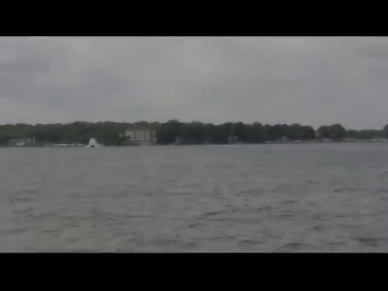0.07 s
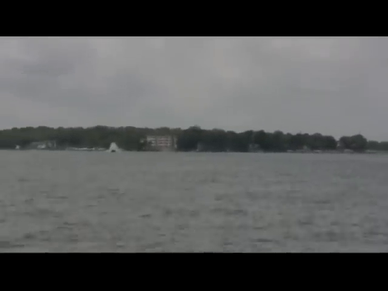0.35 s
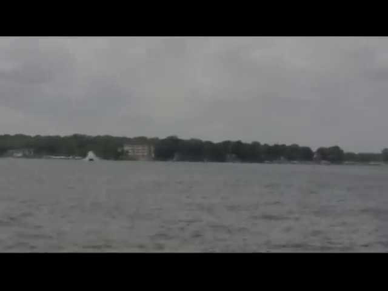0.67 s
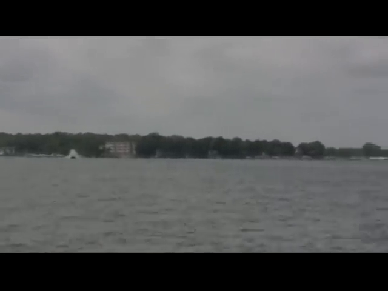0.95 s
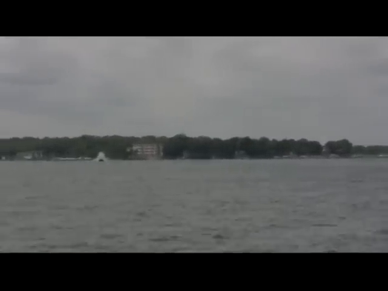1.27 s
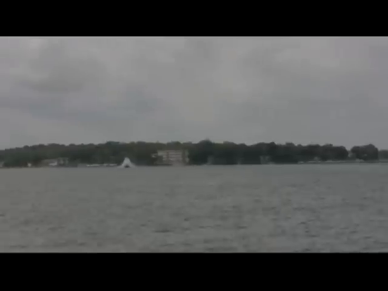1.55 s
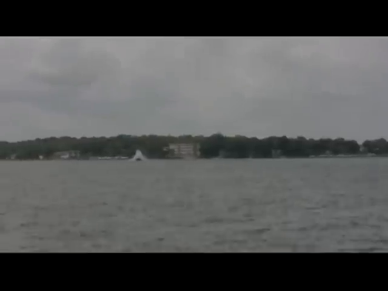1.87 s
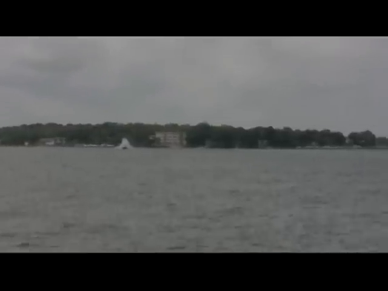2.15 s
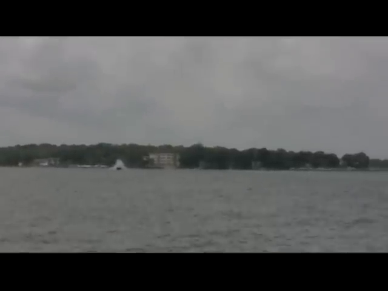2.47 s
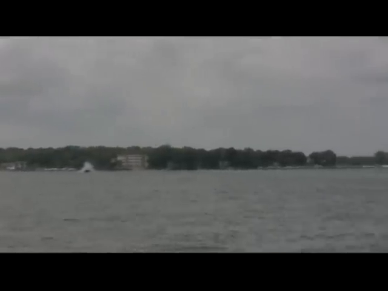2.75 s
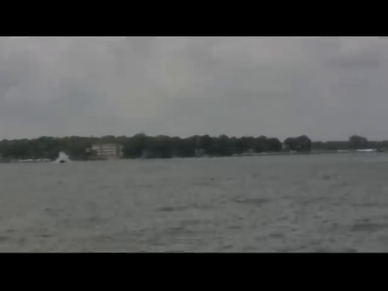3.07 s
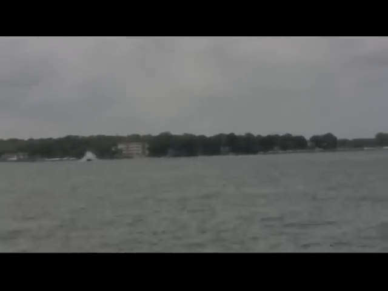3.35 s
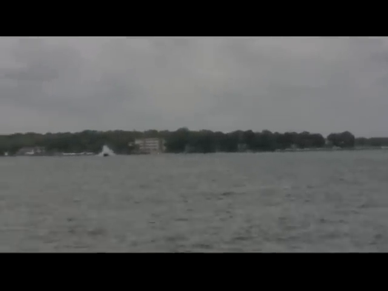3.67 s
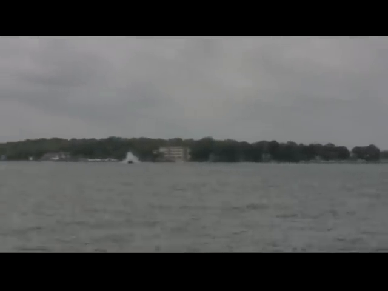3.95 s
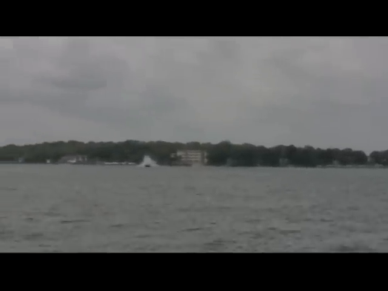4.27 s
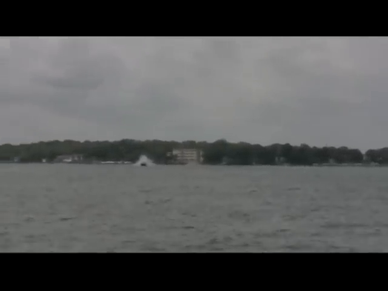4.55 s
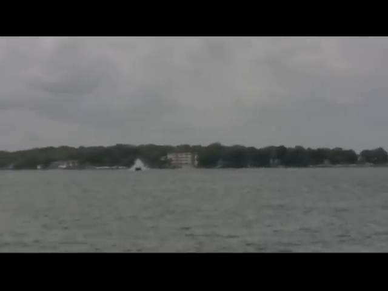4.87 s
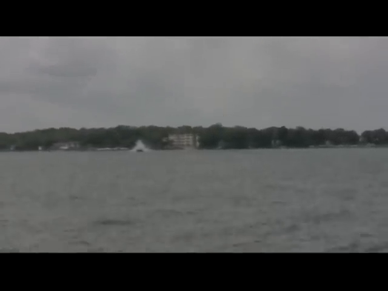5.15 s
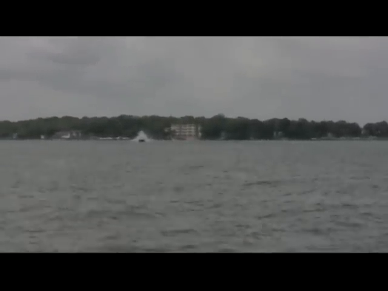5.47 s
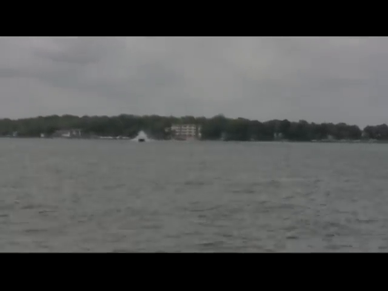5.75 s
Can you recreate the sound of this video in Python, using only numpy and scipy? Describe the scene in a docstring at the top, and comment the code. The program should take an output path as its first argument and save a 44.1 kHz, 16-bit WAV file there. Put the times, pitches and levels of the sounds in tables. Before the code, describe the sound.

Far out on a lake, a twin-engine speedboat drones steadily, swelling a little early on and gradually gaining speed. Low, uneven wind buffeting on the microphone is the loudest sound and partly covers it the whole time. At the water's edge near the microphone, little waves break in scattered clusters, slapping, gurgling and shedding light spray.

```python
"""Wind buffets the microphone on a lake shore, its eddies thumping and rumbling.
Far out, half buried in the wind, a speedboat's two engines slowly gain speed: their exhaust is
a dull roar with faint engine lines from uneven firing, and its resonances drone and honk.
Close by, small waves wash in: foam and spray fizz, crests slap, trapped air pockets gulp."""
import sys
import numpy as np
from scipy import signal
from scipy.fft import rfft, irfft, next_fast_len
from scipy.io import wavfile

SR = 44100
rng = np.random.default_rng(int(sys.argv[2]) if len(sys.argv) > 2 else 0)


def int16_out(signal):
    """Quantize to a 16-bit WAV file."""
    q = np.round(np.clip(np.atleast_2d(signal).T, -1, 1) * 32767)
    wavfile.write(sys.argv[1], SR, q.astype(np.int16))


N = 265482
TIME = np.arange(N) / SR
STEPS = TIME[::40]   # coarse time axis for slow envelopes

# Wind on the microphone, from the largest eddies to the smallest: freq_hz, density_db
BUFFET_SPECTRUM = [(13, -35), (22, -25), (70, 2.5), (150, -2.5), (200, -41), (330, -120)]
DEEP_RUMBLE_SPECTRUM = [(70, -29.5), (100, -5), (150, 1), (215, 3.5), (270, -2), (380, -16)]
HIGH_RUMBLE_SPECTRUM = [(150, -8), (220, -2.5), (290, -1), (350, -2.5), (420, -10), (600, -20),
                        (1000, -32.5), (2500, -69.5)]
# Breeze at the microphone: time_s, rumble_db
BREEZE = [(0, -21), (0.12, -21), (0.205, -22.5), (0.24, -30.5), (0.3, -23), (0.42, -25), (0.58, -24.5),
          (0.8, -27), (0.93, -32), (1.15, -26.5), (1.8, -26), (2.2, -23.5), (2.9, -23.5), (3.14, -29.5),
          (3.35, -23), (4.3, -24.5), (5.1, -25), (5.38, -27.5), (5.55, -25), (6.02, -24)]
# Gusts standing out of the breeze: peak_s, thump_db, rumble_db
GUSTS = [(0.175, -25, -26), (0.283, -25, -19), (0.5, -42, -21.5), (0.7, -38, -23.5), (0.811, -23.5, -21.5),
         (0.99, -21.5, -31), (1.29, -23, -27), (1.45, -26, -35), (1.66, -24, -23), (1.81, -24.5, -46),
         (1.92, -28, -26.5), (2.03, -27.5, -24), (2.249, -24, -20), (2.401, -37, -24.5), (2.58, -27, -25),
         (3.37, -28, -43), (3.46, -38, -26.5), (3.7, -33, -41), (4.45, -27.5, -29), (4.53, -27, -43),
         (4.95, -27, -30), (5.12, -34, -23), (5.57, -40, -24.5), (5.95, -24.5, -38)]

# Speed of the first engine, in four-stroke cycles: time_s, cycle_hz
ENGINE_SPEED = [(0, 39.7), (0.95, 40.55), (1.45, 41.2), (1.8, 41.9), (1.98, 42.05), (2.12, 42.45),
                (2.45, 43.2), (3.1, 43.6), (3.5, 43.35), (4.45, 44.1), (4.85, 45.0), (6.02, 45.6)]
# Exhaust lines: cycle_multiple, level_db
ENGINE_ORDERS = [(2, -2), (3, -10), (4, 1), (8, -2), (9, 2.5), (10, -9.5), (11, 0.5), (12, 2), (14, -14),
                 (16, -8), (17, -10.5), (19, -14.5), (24, -30.5)]
# The exhaust's roar, rasp and higher resonance, heard from the shore: freq_hz, density_db
ROAR_SPECTRUM = [(200, -27.5), (330, -10.5), (430, 3), (540, 1.5), (650, -1.5), (780, -8), (900, -31.5),
                 (1300, -31), (3000, -69)]
RASP_SPECTRUM = [(500, -2.5), (800, 6), (1050, 4.5), (1400, -2.5), (2000, -9.5), (3000, -17.5), (4200, -25),
                 (7000, -52.5), (16000, -68.5)]
HONK_SPECTRUM = [(850, -11), (1080, -3.5), (1300, -14.5), (1600, -30.5)]
# How well the boat carries over the water: time_s, roar_db, line_share_db
CARRY = [(0, -35.5, -4), (0.6, -35, -7), (0.92, -38.5, 0.5), (1.1, -37, 6), (1.4, -30.5, -1.5),
         (1.52, -31.5, 2.5), (1.63, -32, -0.5), (1.76, -33, 1.5), (1.9, -34.5, -1.5), (1.98, -29.5, -2.5),
         (2.07, -37.5, -5), (2.18, -34, 3.5), (2.28, -37, -3.5), (3.3, -36.5, -1.5), (4.55, -37, -5),
         (4.95, -33, -4.5), (5.38, -38.5, -4), (5.8, -35.5, -10), (6.02, -36.5, -9)]
# The exhaust's rasp, its drone, and the honk that comes through late in the run: time_s, level_db
RASP_LEVEL = [(0, -47), (0.55, -53.5), (0.97, -51.5), (1.4, -43), (2.25, -49), (2.6, -52.5), (3.1, -50),
              (4.55, -55.5), (4.95, -46.5), (5.38, -55), (5.85, -49), (6.02, -50)]
DRONE_LEVEL = [(0, -48.5), (0.95, -50), (1.08, -35.5), (1.3, -35), (1.5, -46), (1.63, -32.5), (1.73, -37),
               (1.87, -32), (1.92, -44), (1.975, -29.5), (2.05, -35.5), (2.17, -36.5), (2.23, -52),
               (2.55, -39), (2.9, -47.5), (6.02, -49)]
HONK_LEVEL = [(0, -66), (4.5, -62.5), (4.85, -46.5), (5.22, -50), (5.38, -53.5), (5.8, -46.5), (6.02, -51)]

# Steady hiss of foam along the shore: time_s, level_db
FOAM_LEVEL = [(0, -56.5), (0.8, -69), (1.4, -57.5), (2.35, -63), (3.45, -61.5), (3.95, -68.5), (6.02, -68)]
# Foam and fine spray at close range: freq_hz, density_db
FOAM_SPECTRUM = [(1500, 0.5), (3000, 4.5), (4200, 0.5), (5500, 0.5), (8000, -4.5), (12000, -4.5),
                 (14500, -5.5), (16500, -13)]
SPRAY_SPECTRUM = [(1180, -16), (2000, -5.5), (2690, -10.5), (3040, 0), (4120, -9.5), (5030, -2.5),
                  (7120, -7.5), (8480, -10.5), (9740, -9.5), (16000, -13)]
# Wavelets breaking near the microphone: start_s, length_s, gurgle_db, spray_db
WAVELETS = [(0.028, 0.12, -56, -87), (0.445, 0.13, -45.5, -66.5), (0.558, 0.11, -45, -60),
            (0.77, 0.071, -57, -67.5), (1.204, 0.14, -45.5, -61), (1.833, 0.25, -49, -66.5),
            (2.479, 0.24, -42.5, -57), (2.563, 0.23, -49.5, -57), (2.916, 0.023, -49, -60.5),
            (3.238, 0.048, -50.5, -70), (4.153, 0.24, -52, -74.5), (4.865, 0.2, -49.5, -66.5),
            (4.93, 0.035, -56, -62.5), (5.646, 0.11, -53, -73)]
# Single drops falling back: start_s, level_db, pitch_hz
DRIPS = [(0.093, -48, 4200), (0.162, -53, 5000), (0.455, -48, 3500), (0.474, -52, 3500), (0.559, -46, 5200),
         (0.666, -48, 5300), (0.683, -43, 5300), (0.696, -48, 5300), (0.781, -53, 5600),
         (0.802, -45.5, 2850), (0.85, -53, 5500), (0.976, -53, 5060), (1.056, -57, 10000),
         (1.81, -53, 5600), (1.941, -50, 5000), (1.981, -54, 5000), (2.085, -48, 4000), (2.096, -53, 5200),
         (2.666, -43, 3500), (2.688, -46, 5430), (2.767, -41, 3200), (3.29, -52, 14000),
         (3.456, -51, 12000), (3.577, -58, 9000), (4.195, -57, 5500), (4.272, -56, 5000), (4.44, -61, 8500),
         (4.997, -45, 5000), (5.012, -42, 5340), (5.013, -40, 2900), (5.081, -51, 7500), (5.162, -54, 5000),
         (5.165, -55, 13000), (5.643, -51, 5945), (5.672, -54, 4200), (5.693, -49, 5900), (5.76, -57, 5000)]
# Crests slapping the shore: start_s, crack_db, smack_db, t60_s
SLAPS = [(0.455, -45, -51, .03), (0.524, -46, -43, 0.054), (0.588, -54, -42, 0.056),
         (0.627, -42, -43, 0.053), (0.663, -43, -48, .05), (0.68, -46, -42, 0.12), (0.875, -53, -34, 0.013),
         (1.22, -32.5, -30, 0.044), (1.282, -41, -33, 0.042), (1.343, -39.5, -36, 0.08),
         (1.395, -42, -36, 0.042), (2.003, -32, -40, 0.0082), (2.484, -42, -36, 0.036),
         (2.523, -46, -39, 0.03), (2.543, -44, -33, 0.054), (2.584, -34.5, -38, 0.078),
         (2.624, -55, -48, 0.036), (2.664, -43, -40, 0.1), (2.691, -42, -46, 0.1), (2.758, -40, -42, 0.11),
         (2.793, -37, -42, .018), (4.966, -37, -31.5, 0.028), (4.968, -35, -31, 0.026)]
# Tiny bubbles bursting: start_s, level_db
SNAPS = [(0.523, -44), (0.7815, -50), (1.2228, -48), (2.004, -53), (2.486, -45), (2.591, -33), (2.689, -37),
         (2.794, -42), (2.868, -49), (2.943, -46), (4.972, -45), (5.014, -53), (5.033, -56), (5.078, -51),
         (5.083, -52), (5.102, -40)]
# Trapped air pockets: start_s, level_db, pitch_hz, t60_s
GULPS = [(0.528, -32.5, 1160, .035), (0.602, -38.5, 1390, 0.034), (0.681, -32, 1500, 0.026),
         (1.348, -31, 1540, 0.021), (1.366, -34.5, 1460, 0.026), (1.398, -19.5, 764, 0.033),
         (2.487, -27, 710, 0.03), (2.504, -33.5, 1240, 0.02), (2.527, -38, 1770, .025),
         (2.539, -25, 720, 0.039), (2.54, -33, 1490, 0.023), (2.625, -34, 1610, 0.026),
         (2.686, -40, 1500, 0.034), (2.803, -37, 1360, 0.022), (3.011, -27, 744, 0.035),
         (3.244, -36, 1400, 0.017), (4.186, -37, 820, 0.088), (4.882, -25, 760, 0.014),
         (4.967, -24.5, 836, 0.021), (4.97, -28, 1270, 0.011), (5.908, -19, 696, 0.014)]
# Noise that differs between the microphone's two ports: freq_hz, density_db
PORT_SPECTRUM = [(15, -59.5), (25, -20.5), (59, -17.5), (156, 0.5), (397, 0.5), (527, -4), (1680, -32),
                 (2970, -38), (5530, -37.5), (10800, -38), (12000, -49.5), (15600, -79), (22000, -120)]


def from_db(db):
    """Decibels to gain."""
    return 10 ** (np.asarray(db) / 20)


def rms_one(x):
    """Scale to an rms of 1."""
    return x / np.sqrt(np.mean(x ** 2) + 1e-20)


def in_time(rows):
    """Each column of a curve at every sample."""
    times, *columns = np.transpose(rows)
    return [np.interp(TIME, times, column) for column in columns]


def filtered(x, order, hz, kind):
    """Butterworth filter."""
    return signal.sosfilt(signal.butter(order, hz, kind, fs=SR, output="sos"), x)


def coloured(x, spectrum):
    """Give a steady signal a spectrum that falls 30 dB an octave beyond its ends; rms 1."""
    hz, db = np.transpose(spectrum)
    size = next_fast_len(N)
    octave, knots = np.log2(np.maximum(np.fft.rfftfreq(size, 1 / SR), 1)), np.log2(hz)
    beyond = np.abs(octave - np.clip(octave, knots[0], knots[-1]))
    gain = from_db(np.interp(octave, knots, db) - 30 * beyond)
    return rms_one(irfft(rfft(x, size) * gain, size)[:N])


def noise(spectrum):
    """Steady noise of a given colour; rms 1."""
    return coloured(rng.standard_normal(N), spectrum)


def drift(per_s):
    """Smooth random wander that changes about per_s times a second; spread 1."""
    pole = np.exp(-2 * np.pi * per_s * 40 / SR)   # one step every 40 samples
    white = rng.standard_normal(N // 40 + 2002)
    slow = signal.lfilter([1], [1, -2 * pole, pole * pole], white)[2000:]
    return np.interp(np.arange(N) / 40, np.arange(len(slow)), rms_one(slow))


def grains(per_s, spread_db):
    """Random clicks of either sign, a few larger than the rest."""
    sizes = from_db(spread_db * np.minimum(rng.exponential(1, N), 4))
    return sizes * rng.choice([-1, 1], N) * (rng.random(N) < per_s / SR)


def grit(per_s):
    """A dense hail of tiny impacts of uneven size; rms 1."""
    return rms_one(grains(per_s, spread_db=1.0))


def ring(clicks, hz, t60):
    """A unit click sets a sine of height 1 ringing."""
    pole, angle = from_db(-60 / (t60 * SR)), 2 * np.pi * hz / SR
    return signal.lfilter([0, np.sin(angle)], [1, -2 * pole * np.cos(angle), pole * pole], clicks + 1e-18)


def gusts(peaks, width_s=0.028):
    """Gain of a run of gusts (peak_s, level_db), each a short bell-shaped swell."""
    power = sum((from_db(db) * np.exp(-.5 * ((STEPS - s) / width_s) ** 2)) ** 2 for s, db in peaks)
    return np.interp(TIME, STEPS, np.sqrt(power))


def wind():
    """Large eddies thump on the microphone, smaller ones rumble higher; a low cut takes the deepest."""
    breeze_db, = in_time(BREEZE)
    buffet_db = -30 - 0.5 * TIME - 1.5 * drift(2.5)   # flutters and slowly eases
    buffet_gain = np.hypot(from_db(buffet_db), gusts((s, db) for s, db, _ in GUSTS))
    rumble_gain = np.hypot(from_db(breeze_db), gusts((s, db) for s, _, db in GUSTS))
    shift_db = -2.5 + 1.02 * TIME   # the rumble moves from its deep to its higher part
    deep = from_db(-shift_db) * noise(DEEP_RUMBLE_SPECTRUM)
    high = from_db(shift_db) * noise(HIGH_RUMBLE_SPECTRUM)
    thumps = from_db(-5.5) * buffet_gain * noise(BUFFET_SPECTRUM)
    rumble = from_db(-4.5) * rumble_gain * (deep + high)
    return filtered(thumps + rumble, 4, 22, "high")


def engine_lines(cycles, fading_db):
    """Uneven firing gives lines at multiples of the cycle rate; each fades by itself over the water."""
    lines = np.zeros(N)
    for order, db in ENGINE_ORDERS:
        gain = from_db(db + fading_db * drift(1.6))
        phase = 2 * np.pi * (order * cycles + rng.random())
        lines += gain * np.sin(phase + .25 * drift(14))   # gusty air roughens the line
    return rms_one(lines)


def drone(cycles, order=13):
    """The engine line that meets the exhaust's resonance sings out; gusts shake its level and phase."""
    drone_db, = in_time(DRONE_LEVEL)
    gain = from_db(drone_db - 0.5 + 2.0 * drift(14))
    return np.sqrt(2) * gain * np.sin(2 * np.pi * order * cycles + .35 * drift(14))


def boat(twin_speed_ratio=.924, twin_db=-6.5, throb=0.15, cylinders=8):
    """Two distant engines, out of step; the exhaust pulses with each firing and cycle of the first."""
    cycle_hz, = in_time(ENGINE_SPEED)
    roar_db, line_share_db = in_time(CARRY)
    rasp_db, = in_time(RASP_LEVEL)
    honk_db, = in_time(HONK_LEVEL)
    cycles = np.cumsum(cycle_hz * (1 + 0.0014 * drift(7.5))) / SR
    first = engine_lines(cycles, fading_db=2.0)
    twin = from_db(twin_db) * engine_lines(cycles * twin_speed_ratio, fading_db=1.0)
    lines = from_db(roar_db + line_share_db - 0.5) * (first + twin)
    firing = 1 + throb * (np.cos(2 * np.pi * cylinders * cycles) + np.cos(2 * np.pi * cycles))
    # the more of the sound is in clean lines, the less is in the roar
    noisy_share = np.sqrt(np.clip(1 - .5 * from_db(line_share_db) ** 2, .4, 1))
    roar = noisy_share * from_db(roar_db + 1.48) * noise(ROAR_SPECTRUM)
    rasp = from_db(rasp_db + 2.0) * noise(RASP_SPECTRUM)
    honk = from_db(honk_db) * noise(HONK_SPECTRUM)
    return lines + drone(cycles) + firing * (roar + rasp + honk)


def foam(spray_db):
    """Foam hisses along the shore, and more while a wavelet is breaking."""
    steady_db, = in_time(FOAM_LEVEL)
    return np.hypot(from_db(steady_db - 4.5), from_db(spray_db - 13.5)) * noise(FOAM_SPECTRUM)


def breaking(start_s, length_s, attack_s, drain_s=0.076):
    """A wavelet builds, keeps breaking for its length, then drains away."""
    age = np.maximum(STEPS - start_s, 0)
    return (1 - np.exp(-age / attack_s)) * np.exp(-np.maximum(age - length_s, 0) / drain_s)


def surf():
    """Gurgle and spray levels in dB at the water's edge; spray builds more slowly and lands for longer."""
    gurgle, drops = from_db(-55), from_db(-79)   # steady lapping between wavelets
    for s, length_s, gurgle_db, spray_db in WAVELETS:
        gurgle = np.hypot(gurgle, from_db(gurgle_db) * breaking(s, length_s, attack_s=0.0056))
        drops = np.hypot(drops, from_db(spray_db) * breaking(s, length_s + .015, attack_s=0.026))
    return [np.interp(TIME, STEPS, 20 * np.log10(gain)) for gain in (gurgle, drops)]


def bubbles(per_s, band_hz, cycles, spread_db, sizes=18):
    """Bubbles born at random, each ringing for some cycles; the small high ones are weaker; rms 1."""
    births, size = grains(per_s, spread_db), rng.integers(0, sizes, N)
    pitches = enumerate(np.geomspace(*band_hz, sizes))
    return rms_one(sum(ring(births * (size == k), hz, cycles / hz) / np.sqrt(hz) for k, hz in pitches))


def wash(gurgle_db, spray_db):
    """A wavelet sloshes with clumps of large bubbles and sheds drops; faint ticks go on between waves."""
    clumped_db = gurgle_db - 4.5 + 2.4 * drift(31)
    gurgle = from_db(clumped_db) * bubbles(per_s=1800, band_hz=(1020, 3280), cycles=11, spread_db=2.0)
    slosh = from_db(gurgle_db - 2.0) * bubbles(per_s=350, band_hz=(700, 1750), cycles=12, spread_db=1.5)
    drops = from_db(spray_db - 5.5) * bubbles(per_s=260, band_hz=(2600, 8000), cycles=11, spread_db=3.5)
    ticks = from_db(-77.5) * bubbles(per_s=45, band_hz=(5500, 14500), cycles=5, spread_db=3.0)
    return gurgle + slosh + drops + ticks


def spray(spray_db):
    """Thousands of fine droplets a second land in clumps."""
    return from_db(spray_db + 0.5 + 2.7 * drift(50)) * coloured(grit(per_s=2700), SPRAY_SPECTRUM)


def drips(cycles=11, patter_s=0.0015):
    """Each drop bursts in a tiny patter that rings at the drop's pitch."""
    out, age = np.zeros(N), TIME[:SR // 30]
    for s, db, hz in DRIPS:
        patter = rng.standard_normal(len(age)) * np.sqrt(age) * np.exp(-age / patter_s)
        note, at = ring(patter, hz, cycles / hz), round(s * SR)
        out[at:at + len(age)] += from_db(db + 2.0) * note / np.abs(note).max()
    return out


def slaps(attack_share=0.068):
    """A crest hits the shore with a broad smack and a crack of droplets; the cavity under it rings."""
    crack_gain, smack_gain = np.zeros((2, N))
    for s, crack_db, smack_db, t60 in SLAPS:
        at = round(s * SR)
        progress = TIME[:min(SR // 3, N - at)] / t60
        shape = (1 - np.exp(-progress / attack_share)) * from_db(-np.minimum(60 * progress, 200))
        crack_gain[at:at + len(shape)] += from_db(crack_db) * shape
        smack_gain[at:at + len(shape)] += from_db(smack_db) * shape
    crack = filtered(crack_gain * grit(per_s=9000) + 1e-18, 1, [1500, 6800], "band")
    smack = filtered(smack_gain * rng.standard_normal(N) + 1e-18, 2, [640, 2450], "band")
    cavity = ring(crack, hz=5300, t60=0.00045)
    return from_db(1.0) * crack + from_db(8.5) * smack + from_db(-8.0) * cavity


def snaps(decay_s=.0002):
    """A bubble's bursting film gives one bright click, gone within a millisecond or two."""
    out, age = np.zeros(N), TIME[:SR // 200]
    for s, db in SNAPS:
        burst = rng.standard_normal(len(age)) * age * np.exp(-age / decay_s)
        click, at = filtered(burst, 1, [3500, 14000], "band"), round(s * SR)
        out[at:at + len(age)] += from_db(db + 0.5) * click / np.abs(click).max()
    return out


def gulps(swell_s=.0015, rise=.015):
    """An air pocket swells into a short, wobbling, rising note, blurred by the churning water round it."""
    out = np.zeros(N)
    wobble, churn = .6 * drift(260), .75 * drift(700)
    for s, db, hz, t60 in GULPS:
        age = np.clip(TIME - s, 0, 2 * t60)
        shape = (1 - np.exp(-age / swell_s)) * from_db(db + 6 - 60 * age / t60)
        phase = 2 * np.pi * hz * age * (1 + rise * age / t60) + wobble * hz / 1000
        out += shape * (np.sin(phase) + churn * np.cos(phase))
    return out


def scene():
    """Both microphone ports hear nearly the same, the water slightly right; the spray spreads wider."""
    gurgle_db, spray_db = surf()
    splashes = gulps() + slaps() + drips() + snaps()
    water = splashes + wash(gurgle_db, spray_db) + spray(spray_db)
    mid = wind() + boat() + foam(spray_db)
    side = from_db(-53.0) * noise(PORT_SPECTRUM) + from_db(-13.0) * spray(spray_db)
    side = filtered(side, 8, 11000, "low")
    return np.array([mid + side + water, mid - side + from_db(0.33) * water])


def record(dry):
    """The sound is eased in and out over 4 ms, and cut steeply above 16.5 kHz."""
    eased = dry * np.clip(np.minimum(TIME, TIME[-1] - TIME) / .004, 0, 1)
    return signal.sosfilt(signal.ellip(12, .2, 80, 16500, fs=SR, output="sos"), eased)


dry = scene()
out = record(dry)
int16_out(out)
```